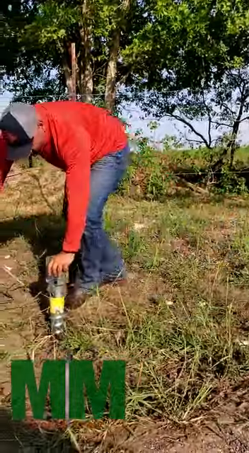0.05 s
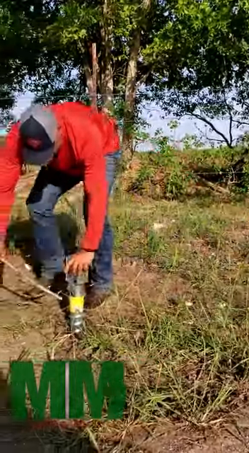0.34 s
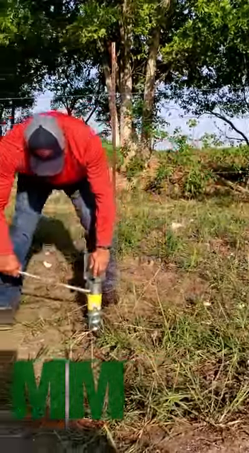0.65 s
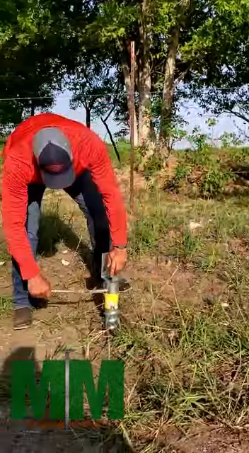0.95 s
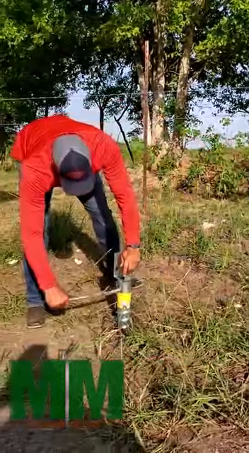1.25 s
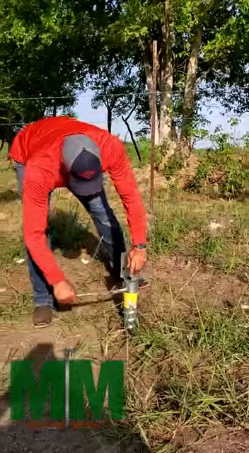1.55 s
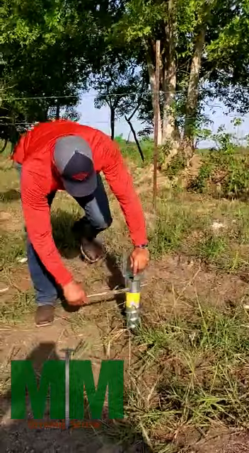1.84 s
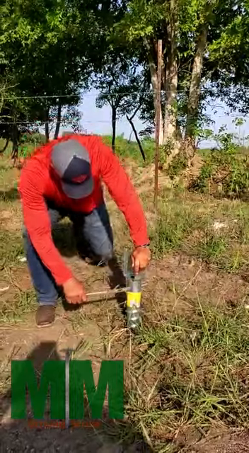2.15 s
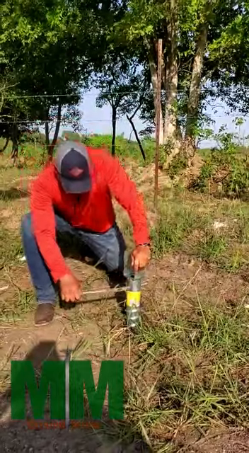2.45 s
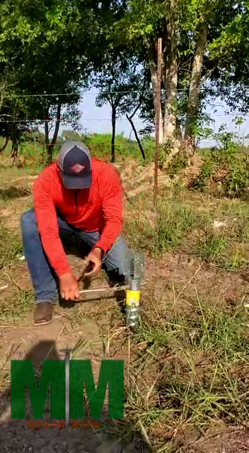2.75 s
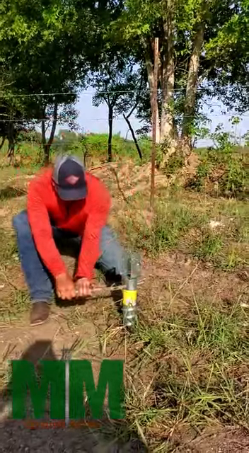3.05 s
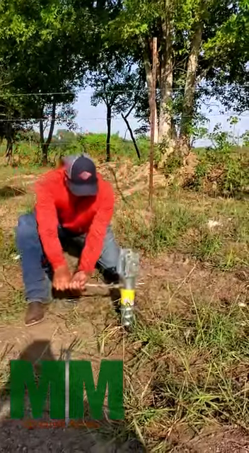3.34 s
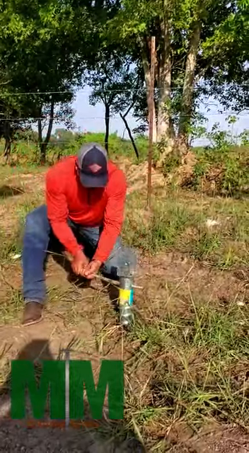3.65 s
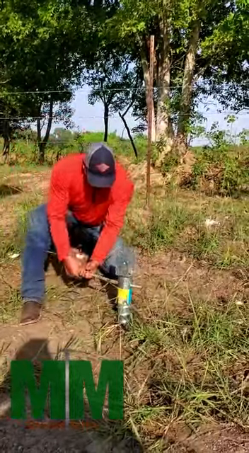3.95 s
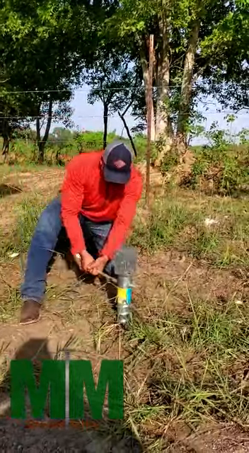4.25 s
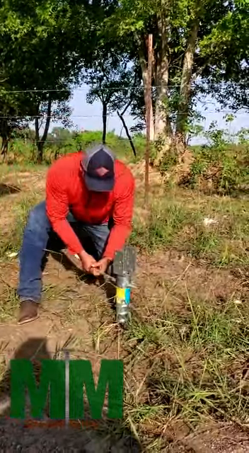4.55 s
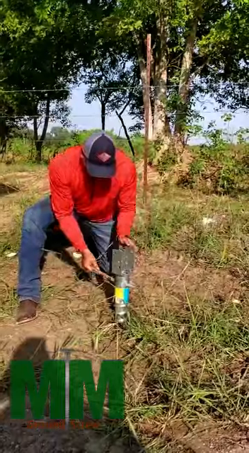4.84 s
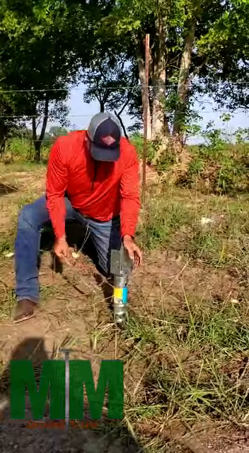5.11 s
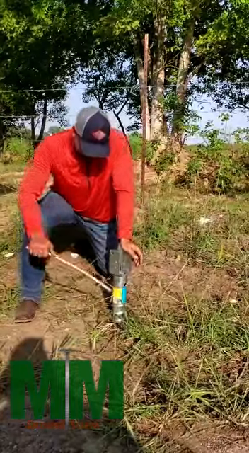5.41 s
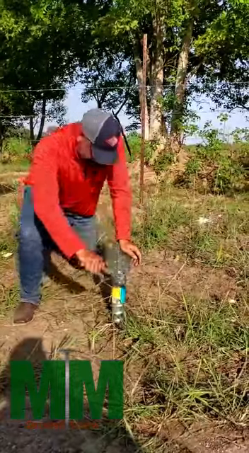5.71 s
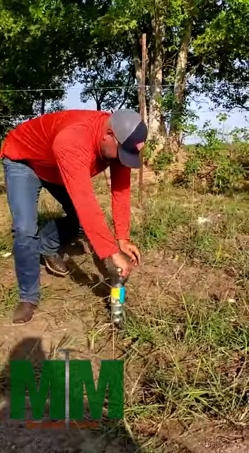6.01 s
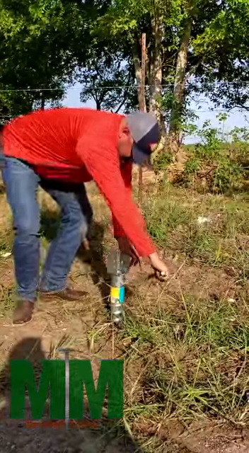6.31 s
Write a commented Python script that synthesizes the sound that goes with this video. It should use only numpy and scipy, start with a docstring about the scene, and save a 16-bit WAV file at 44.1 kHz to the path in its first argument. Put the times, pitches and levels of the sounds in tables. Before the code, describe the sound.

Close, bright metal clinks and rattles come in uneven clusters as a steel bar slides into the head of a ground screw outdoors, amid soft boot steps in dry grass. In a quieter stretch, the screw grinds briefly in the soil and small birds chirp faintly. A quick metallic clatter follows, then a few more knocks as tyre noise swells. A low rumble, far traffic and a thin hiss run underneath.

```python
"""A field, over a low rumble, a far road and a thin hiss. Boots brush and thud in grass; dry stalks snap.
A hand-held steel bar is threaded through the head of a ground screw: each contact clanks the earth-damped
tube and rings the bar, and its ribs tick over the rim. Faint birds whistle while the bar levers the screw
round, the thread grinding in dry soil. The bar clatters out and back in as a vehicle's tyres draw near."""
import sys
import numpy as np
from scipy import signal
from scipy.fft import rfft, irfft
from scipy.io import wavfile
from scipy.ndimage import uniform_filter1d

SR = 44100
rng = np.random.default_rng(int(sys.argv[2]) if len(sys.argv) > 2 else 0)


def unload_wav(signal):
    """Save mono or channel-first audio to the path in sys.argv[1] as 16-bit WAV at rate SR, clipped to [-1, 1]."""
    wavfile.write(
        sys.argv[1],
        SR,
        np.round(np.clip(np.atleast_2d(signal).T, -1, 1) * 32767).astype(np.int16),
    )


N = 289737
TIME = np.arange(N) / SR
BINS = np.fft.rfftfreq(N, 1 / SR)

# tone colour of the rumble, the road and the hiss: f/Hz, relative density/dB
RUMBLE_SPECTRUM = [(12, -71), (20, -29.5), (52, -0.5), (75, 2.5), (94, -1), (267, -28), (330, -94),
                   (430, -79), (730, -120)]
ROAD_SPECTRUM = [(120, -2), (200, -4.5), (419, -9.5), (812, -3.5), (916, -3.5), (1350, -3.5), (2380, -16.5),
                 (2760, -19.5), (3040, -19), (3920, -26), (5000, -26), (6500, -32), (11000, -120)]
HISS_SPECTRUM = [(2060, -7.5), (3500, -2.5), (4890, -6), (5340, -16), (7090, -5), (8000, -18.5),
                 (12500, -11.5), (14600, -10), (15800, -7.5)]
# fader rides of the rumble and the far road: t/s, level/dB
RUMBLE_RIDE = [(0, -52), (.5, -47.5), (1.8, -53), (2.55, -45), (3.2, -50), (3.6, -46), (6.57, -52)]
ROAD_RIDE = [(0, -61.5), (1.9, -60.5), (3.35, -57), (4.75, -54.5), (5.6, -58.5)]
# boots and clothes brushing dry grass: t/s, length/s, level/dB
GRASS_BRUSHES = [(0.0, 0.087, -62), (0.28, 0.45, -59), (2.04, 0.028, -50), (2.15, 0.51, -65),
                 (2.81, 0.28, -65.5), (5.17, 0.15, -60), (5.79, .12, -46.5), (6.06, 0.089, -58.5),
                 (6.13, 0.14, -58)]
# boots landing on soil: t/s, level/dB, thud f/Hz
FOOTFALLS = [(0.061, -57.5, 257), (0.512, -47.5, 380), (0.54, -52.5, 385), (2.048, -42, 202),
             (6.174, -43.5, 218)]
# dry stalks breaking: t/s, level/dB
STALK_SNAPS = [(0.316, -57), (2.228, -56.5), (2.478, -56.5), (3.335, -53.5), (3.695, -70)]
# bar hitting screw: t/s, level/dB, hardness/(dB per octave), extra main ring/dB,
# looseness (1 = usual grip), clank f/Hz, main ring f/Hz
BAR_HITS = [(0.4492, -35, 4.5, -1.5, 0.69, 1194, 2385), (0.503, -48, 2.8, 0, 2.1, 1210.0, 2463),
            (0.583, -47, -0.9, 0.5, 0.92, 1040, 2426), (0.718, -57, -3.5, 2.5, 2.0, 1185.0, 2440),
            (0.749, -53.5, -3.5, 2, 2.4, 1170.0, 2380), (0.784, -45, 0.2, 2, 1.13, 1700, 2440),
            (0.852, -33.5, 0.2, -14, 0.3, 1160, 2370), (0.865, -36, 0.5, 8, 1.6, 2025.0, 2390),
            (0.882, -40, -2, 7.5, 0.91, 1590.0, 2330), (0.8946, -26.0, 1.6, -7.5, 0.42, 1195, 2473),
            (1.129, -53.0, -2, 2, 1.3, 1610.0, 2440), (1.171, -51, -0.4, 5.5, 2.5, 1185.0, 2380),
            (1.204, -36.5, 8, 2, 0.31, 2040, 2453), (1.272, -46.5, 2.2, 0, 2.9, 1670.0, 2440),
            (1.3119, -39.5, -0.4, 0.5, 0.29, 1980, 2954), (1.466, -59, -4.5, 5, 0.37, 1190, 2480),
            (1.5823, -41.5, 3, 0.5, 0.84, 2060, 2482), (1.611, -50, -0.5, -1, 1.5, 2020.0, 2450),
            (1.676, -40, 0.2, 0.5, 2.9, 1210.0, 2670), (1.696, -32.5, -2.5, 1.5, 0.3, 1344, 2466),
            (1.7027, -28, 1.5, -2, 0.47, 1200.0, 2485), (1.789, -50.5, 0.0, 4.5, 0.69, 1750.0, 2443),
            (1.979, -62.5, -5, 3.5, 0.18, 1220.0, 2620), (4.6434, -47.5, -3, 0, 1.6, 1670, 2390),
            (4.676, -51.5, 1.5, 9.5, 0.22, 1200, 2524), (4.858, -36, -1, 0.5, 0.97, 1770, 2480),
            (4.884, -38.5, -4.5, 2, 0.32, 1710, 2420), (4.901, -42, 0.7, 0.5, 0.87, 1670, 2450),
            (4.915, -40, 0, 4, 3.5, 1600.0, 2450), (4.931, -34.5, 1, 1, 1.7, 1600.0, 2380),
            (4.9423, -35.5, -1, 12, 2, 1610.0, 2380), (4.959, -35.5, 8, -6, 1.02, 1605.0, 2420),
            (4.966, -37, 10, 6, 0.81, 1546, 2384), (5.776, -35.5, 1.3, -2.5, 0.78, 1680, 2330),
            (5.81, -44.5, -4, -1, 0.33, 1260, 2580), (6.349, -44.5, -3.2, -2.5, 0.92, 1420, 2550),
            (6.499, -47.5, -5.5, -2.5, 1.1, 1660, 2460), (6.535, -39, 1.5, -14, 2.1, 1690.0, 2400),
            (6.552, -52, 1, 11.5, 0.84, 1680, 2340)]
# modes of the screw's tube, damped by the soil: f/Hz, nominal width/Hz, level/dB
TUBE_MODES = [(565, 45, -17), (1200, 65, -9), (1610, 67, -12), (2420, 35, 0), (2900, 57, -17),
              (3380, 73, -18), (3900, 31, -14), (4480, 81, -10), (4790, 67, -13), (5160, 78, -17),
              (5440, 25, -21), (5590, 31, -22), (5950, 140, -15), (6380, 36, -25), (6580, 43, -24),
              (6980, 150, -20), (7740, 42, -25), (8970, 110, -25), (9580, 98, -39), (10200, 30, -37),
              (10300, 28, -41), (10700, 45, -31), (11100, 55, -34), (12100, 35, -26), (12400, 29, -36),
              (12800, 83, -41)]
# modes of the bar: f/Hz, level/dB, t60 at the usual grip/s
BAR_MODES = [(1260, -19, .12), (1690, -15, .12), (2024, -19, .14), (2416, 2, .21), (2546, -12, .1),
             (3112, -15, .16), (3450, -15, .24), (3908, -13, .13), (4105, -14, .15), (4480, -11, .16),
             (4550, -17, .28), (4786, -11, .11), (5170, -18, .16), (5441, -16, .14), (5965, -11, .13),
             (6975, -15, .12), (7744, -19, .18), (8975, -24, .13), (10730, -27, .15), (12075, -26, .14)]
# dense rattle of a contact: f/Hz, relative density/dB
RATTLE_SPECTRUM = [(71, -52), (120, 0.5), (1020, -8), (1190, -10.5), (1830, -40), (2200, -21), (2440, 1),
                   (2750, -11), (3660, -5.5), (4480, -2.5), (5490, -11), (7160, -13), (8420, -29),
                   (9130, -29.5), (15500, -30)]
# the five registers of a hit (thump, clank, main ring, upper ring, sparkle): low f/Hz, high f/Hz
HIT_REGISTERS = [(170, 900), (900, 2100), (2100, 2900), (2900, 5500), (5500, 15800)]
# voice of each register: radiation/dB, favoured mode over the rest/dB, its t60 at the usual grip/s
REGISTER_VOICES = [(-5, 4, 0.039), (3.6, 1.5, 0.084), (9, -2, 0.17), (4, 0.5, 0.09), (-5.5, -3, 0.16)]
# favoured mode of thump, upper ring and sparkle: usual f/Hz, relative spread from hit to hit
FAVOURED_MODES = [(680, .2), (4490, .05), (5930, 0.0058)]
# bar sliding in its hole: t/s, length/s, level/dB
BAR_SLIDES = [(0.73, 0.13, -44), (1.63, 0.16, -50), (4.87, 0.13, -34.5), (5.8, 0.087, -50.5),
              (6.45, 0.12, -51.5)]
# bird notes: t/s, length/s, f/Hz, glide/octaves, arch above both ends/octaves, level/dB
BIRD_NOTES = [(2.494, 0.029, 2730, -0.29, 0.064, -59.5), (2.651, 0.049, 3900, -0.027, 0.0061, -63),
              (2.701, 0.035, 2900, -0.6, 0.011, -61), (3.414, 0.045, 2790, -0.099, 0.051, -54.5),
              (3.817, 0.037, 2110, -.05, 0.047, -66), (4, 0.081, 2940, -0.03, 0.037, -61),
              (4.064, 0.024, 2730, .16, -0.035, -52.5), (4.498, 0.027, 2794, 0.035, .2, -49),
              (4.606, 0.04, 2860, -0.33, .09, -57), (5.203, .035, 2210, .16, -0.0081, -61.5),
              (5.482, 0.04, 2940, 0.39, -0.041, -61)]
# pulls on the bar that turn the screw: t/s, length/s, level/dB
LEVER_PULLS = [(3.11, 0.32, -56.5), (3.354, 0.19, -51), (4.107, 0.16, -53)]
# resonances of the buried screw: f/Hz, width/Hz, gain/dB
BURIED_RESONANCES = [(2730, 28, 15), (3300, 810, 1), (4350, 1300, -0.5), (5190, 100, 7.5), (6510, 120, 5.5),
                     (7000, 170, 3.5), (8940, 630, -8.5), (10600, 390, -11)]
# stereo balance of near and far sounds: f/Hz, left minus right/dB
NEAR_PAN = [(100, 2.5), (600, -3), (1200, -5), (1900, -0.5), (2450, 0.5), (3300, -5.5), (4500, -8),
            (6500, -9.5), (13000, -15)]
FAR_PAN = [(60, -1.5), (110, 0.5), (200, -0.5), (380, -1), (700, -1.5), (1290, -2.5), (2380, 1.5),
           (4400, -9.5), (8120, -5), (15000, -4.5)]
# stereo phase of near sounds: f/Hz, left lead/rad
NEAR_LEAD = [(100, -0.13), (600, -0.86), (1200, -0.81), (2400, -1.93), (4000, -2.44), (9000, -0.7)]
# stereo likeness of near and far sounds: f/Hz, left-right correlation
NEAR_CORRELATION = [(200, 1), (2400, 0.69), (4500, 0.37), (12000, 0.64)]
FAR_CORRELATION = [(60, 1), (130, 0.99), (290, 0.94), (640, 0.75), (1410, 0.56), (3100, -0.2), (6820, 0.12),
                   (15000, -0.079)]


def undb(db):
    """Decibels to gain."""
    return 10 ** (np.asarray(db) / 20)


def unit(x):
    """Scale to rms 1."""
    return x / np.sqrt(np.mean(x ** 2) + 1e-20)


def unit_attack(x, size=353):
    """Scale to rms 1 over the attack, by default the first 8 ms."""
    return x / np.sqrt(np.mean(x[:, :size] ** 2) + 1e-20)


def curve(points, hz):
    """Read an (f/Hz, value) curve on a log-frequency axis."""
    f, value = np.transpose(points)
    return np.interp(np.log(np.maximum(hz, 1)), np.log(f), value)


def add(out, s, sound):
    """Mix a sound in at time s."""
    i = max(int(s * SR), 0)
    out[:, i:i + sound.shape[-1]] += sound[..., :max(N - i, 0)]


def band(x, lo_hz, hi_hz, order=3):
    """Causal band-pass."""
    sos = signal.butter(order, [lo_hz, min(hi_hz, SR / 2 - 1)], "band", fs=SR, output="sos")
    return signal.sosfilt(sos, x)


def fade(t, t60):
    """Hold at 1 until t = 0, then fall 60 dB every t60."""
    return np.exp(-np.log(1000) * np.maximum(t, 0) / t60)


def drift(rate_hz):
    """Smooth random wander at rms 1."""
    hold = int(SR / rate_hz)
    steps = np.repeat(rng.standard_normal(N // hold + 1), hold)
    return unit(uniform_filter1d(uniform_filter1d(steps, hold), hold)[:N])


def noise(spectrum, correlation, size=N):
    """Coloured stereo noise whose width is set per frequency."""
    hz = np.fft.rfftfreq(size, 1 / SR)
    alike = np.clip(curve(correlation, hz), -1, 1)
    mid, side = rfft(rng.standard_normal((2, size)))
    pair = mid * np.sqrt(1 + alike) + np.array([[1], [-1]]) * side * np.sqrt(1 - alike)
    return unit(irfft(pair * undb(curve(spectrum, hz)), size))


def grains(per_s, spread_db):
    """Random tiny impacts, a few much larger than the rest."""
    clicks = (rng.random(N) < per_s / SR) * rng.choice([-1, 1], N)
    return clicks * undb(spread_db * np.minimum(rng.exponential(size=N), 4))


def swells(rows, taper):
    """Soft-edged envelope from rows of t/s, length/s, level/dB."""
    out = np.zeros((1, N))
    for s, length, db in rows:
        add(out, s, undb(db) * signal.windows.tukey(max(int(length * SR), 2), taper))
    return out[0]


def place(x, balance, phase=None):
    """Stereo placement: level and phase differences between the two microphone ports."""
    lead = 0 if phase is None else curve(phase, BINS)
    tilt = undb(curve(balance, BINS))
    left_right = np.array([tilt * np.exp(1j * lead), np.ones(len(BINS))]) * 2 / (1 + tilt)
    return irfft(rfft(x) * left_right, N)


def rumble(throb_db=1.1):
    """A low, throbbing bed of noise."""
    bed = noise(RUMBLE_SPECTRUM, FAR_CORRELATION)
    return bed * undb(np.interp(TIME, *np.transpose(RUMBLE_RIDE)) + throb_db * drift(12))


def road(speed_m_s=23, closest_s=6.638, closest_m=2.4, tyres_at_1m_db=-30.5, flutter_db=1.46):
    """The wash of a far road, and one vehicle whose tyre noise grows as 1 / distance."""
    distance_m = np.hypot(speed_m_s * (TIME - closest_s), closest_m)
    far_traffic = undb(np.interp(TIME, *np.transpose(ROAD_RIDE)))
    level = np.hypot(far_traffic, undb(tyres_at_1m_db) / distance_m)
    return noise(ROAD_SPECTRUM, FAR_CORRELATION) * level * undb(flutter_db * drift(8))


def hiss(level_db=-67.5):
    """A thin, even layer of air on top."""
    return noise(HISS_SPECTRUM, FAR_CORRELATION) * undb(level_db)


def grass(sizzle_db=-5, patchy_db=3.5):
    """Dry stalks crackle in uneven patches as boots and clothes brush them."""
    stalks = np.array([grains(per_s=2200, spread_db=3.5) for _ in range(2)])
    crackle = unit(band(stalks, 2400, 7300, order=2))
    sizzle = undb(sizzle_db) * unit(band(stalks, 9500, 18000, order=2))
    return (crackle + sizzle) * swells(GRASS_BRUSHES, taper=1) * undb(patchy_db * drift(45))


def boots(t60=0.057, heel_s=0.0029, band_ratio=1.85):
    """Each heel pushes a dull thud out of the packed soil."""
    out, t = np.zeros((2, N)), np.arange(SR // 5) / SR
    for s, db, hz in FOOTFALLS:
        push = rng.standard_normal((1, len(t))) * fade(t, t60) * (1 - np.exp(-t / heel_s))
        thud = band(push, hz / band_ratio, hz * band_ratio)
        add(out, s, undb(db) * unit_attack(thud, size=882))
    return out


def snaps(t60=0.089):
    """A stalk breaks in a quick run of splinters."""
    out, t = np.zeros((2, N)), np.arange(SR // 12) / SR
    for s, db in STALK_SNAPS:
        splinters = rng.standard_normal((2, len(t))) ** 3 * fade(t, t60)
        add(out, s, undb(db) * unit_attack(band(splinters, 1900, 4400, order=1)))
    return out


def ring(t, hz, db, t60, scatter_db, detune):
    """Struck steel modes; the point of contact changes their strengths and shifts them a little."""
    strength, shift, spread = rng.standard_normal((3, len(hz)))
    phase = rng.uniform(0, 2 * np.pi, len(hz))
    apart = np.arccos(np.clip(curve(NEAR_CORRELATION, hz), -1, 1)) * spread / 2
    weights = undb(db + scatter_db * strength) * np.exp(1j * (phase + np.array([apart, -apart])))
    waves = np.exp(2j * np.pi * (hz * (1 + detune * shift))[:, None] * t) * fade(t, t60[:, None])
    return unit_attack((weights @ waves).imag)


def sheen_db(hz, lift_db=5.5):
    """A direct steel-on-steel blow lifts a band of high modes."""
    return lift_db * ((hz > 8400) & (hz < 11500))


def steel_blow(t, loose, chatter_s, bar_db=-3, rattle_db=-2, thud_db=-11):
    """One raw hit: the tube clanks, the bar rings, the contact rattles, the shank thuds into the soil."""
    hz, width, db = np.transpose(TUBE_MODES)
    tube_t60 = 1.15 * np.log(1000) / np.pi / width
    tube = ring(t, hz, db + sheen_db(hz), tube_t60, scatter_db=4, detune=0.005)
    hz, db, t60 = np.transpose(BAR_MODES)
    bar = ring(t, hz, db + sheen_db(hz), t60 * loose, scatter_db=5, detune=0.0016)
    rattle = unit_attack(noise(RATTLE_SPECTRUM, NEAR_CORRELATION, len(t)) * fade(t - chatter_s, 0.065))
    thud = unit_attack(band(rng.standard_normal((1, len(t))) * fade(t, 0.12), 114, 500, order=2))
    return tube + undb(bar_db) * bar + undb(rattle_db) * rattle + undb(thud_db) * thud


def clinks(chatter_s=0.0036, rise_s=0.00064, choke_t60=0.075, punch=0.23, mode_punch=0.39, pivot_hz=2260):
    """Bar meets screw: each blow is voiced in five registers and chokes the ring before it."""
    out, t = np.zeros((2, N)), np.arange(SR // 4) / SR
    free_hz = np.array([mode[0] for mode in [*TUBE_MODES, *BAR_MODES]])
    usual_hz, spread = np.transpose(FAVOURED_MODES)
    landings = rng.standard_normal((len(BAR_HITS), len(FAVOURED_MODES)))
    gaps = np.diff([hit[0] for hit in BAR_HITS] + [2 * N / SR])
    touching = fade(t - chatter_s, 0.072)  # the steel is loudest while the parts still touch
    for hit, gap, landing in zip(BAR_HITS, gaps, landings):
        s, level_db, hardness, ring_db, loose, clank_hz, ring_hz = hit
        loose = max(loose, 0.2)
        blow = steel_blow(t, loose, chatter_s)
        # where the bar lands favours one mode in each register
        pitches = np.insert(usual_hz * np.exp(spread * landing), 1, [clank_hz, ring_hz])
        # a harder hit tilts brighter about the pivot, levelling off an octave above it
        octaves = np.minimum(np.log2(np.insert(usual_hz, 1, [clank_hz, ring_hz]) / pivot_hz), 1)
        levels = level_db + hardness * octaves + ring_db * np.array([0, 0, 1, 0, 0])
        choke = fade(t - gap, choke_t60 * loose ** 2)  # a loose bar rings on through the next hit
        envelope = (1 - np.exp(-t / rise_s)) * (1 + punch * touching) * choke
        for (lo, hi), db, hz, voice in zip(HIT_REGISTERS, levels, pitches, REGISTER_VOICES):
            radiation_db, mode_db, t60 = voice
            # a pressed bar is pulled off pitch, a loose one settles on the nearest free mode
            nearest_hz = free_hz[np.argmin(abs(free_hz - hz))]
            hz = hz + (nearest_hz - hz) * min(loose, 1) ** 2
            decay = fade(t, t60 * loose ** 0.75) * (1 + mode_punch * touching)
            mode = np.sin(2 * np.pi * hz * t)[None] * decay
            register = unit_attack(band(blow, lo, hi)) + undb(mode_db) * unit_attack(mode)
            add(out, s, undb(db + radiation_db) * unit_attack(register * envelope))
    return out


def slides(bar_db=-2, tick_db=-12):
    """The ribs of the bar tick densely over the rim of the hole and keep both parts singing."""
    t = np.arange(SR // 8) / SR
    hz, width, db = np.transpose(TUBE_MODES)
    tube = ring(t, hz, db, np.log(1000) / np.pi / width, scatter_db=4.5, detune=0.012)
    bar = ring(t, *np.transpose(BAR_MODES), scatter_db=2, detune=0.0006)
    ticks = grains(per_s=560, spread_db=3.5)
    steel = signal.fftconvolve(tube + undb(bar_db) * bar, ticks[None], axes=1)[:, :N]
    bright = unit(band(steel, 2740, 18000, order=1))  # tiny hard contacts stress the upper modes
    scrape = unit(bright + undb(tick_db) * unit(band(ticks, 1300, 5800)))
    return scrape * swells(BAR_SLIDES, taper=0.53)


def birds(waver=0.013):
    """Short slurred whistles from the trees, each a straight or arched glide."""
    out, wobble = np.zeros((2, N)), 1 + waver * drift(300)
    for s, length, pitch_hz, glide, arch, db in BIRD_NOTES:
        progress = np.linspace(0, 1, max(int(length * SR), 2))
        octaves = glide * (progress - 0.5) - arch * (2 * progress - 1) ** 2
        hz = pitch_hz * 2 ** octaves * wobble[int(s * SR):][:len(progress)]
        whistle = np.sqrt(2) * np.sin(2 * np.pi * np.cumsum(hz) / SR)
        add(out, s, undb(db) * np.sin(np.pi * progress) * whistle)
    return out


def grinding(fizz_db=-5, catch_db=-2.2, build_share=0.67, start_db=-22.5, stop_t60=0.13):
    """Dry soil slips along the thread in dense grains, heard through the buried screw and as fine fizz."""
    grit = np.array([grains(per_s=3500, spread_db=3) for _ in range(2)])
    body = sum(undb(db) * band(grit, hz - width / 2, hz + width / 2, order=1)
               for hz, width, db in BURIED_RESONANCES)
    fizz = undb(fizz_db) * unit(band(grit, 8200, 21700, order=2))
    effort = np.zeros(N)
    for s, length, db in LEVER_PULLS:  # each pull builds, holds, then dies quickly
        slack = np.maximum(1 - (TIME - s) / (build_share * length), 0)
        effort += undb(db + start_db * slack) * fade(TIME - s - length, stop_t60)
    catching = undb(catch_db * drift(60))  # the thread catches and lets go unevenly
    return unit(unit(body) + fizz) * effort * catching


def field_scatter(x, t60, build_s, top_hz):
    """A short outdoor tail, scattered back from the grass and the tree line."""
    t = np.arange(SR // 2) / SR
    wash = band(rng.standard_normal((2, len(t))), 200, top_hz, order=1)
    tail = wash * fade(t, t60) * (1 - np.exp(-t / build_s))
    return signal.fftconvolve(x, unit(tail) / np.sqrt(len(t)), axes=1)[:, :N]


def scene():
    """Steel, soil and boots up front, birds in the trees, the distant bed behind."""
    near = clinks() + slides() + grinding() + boots() + grass() + snaps()
    song = birds()
    near += undb(-24.5) * field_scatter(near, t60=0.29, build_s=0.0037, top_hz=6100)
    song += undb(-7.5) * field_scatter(song, t60=0.13, build_s=0.0082, top_hz=5000)
    far = rumble() + road() + hiss()
    return place(near, NEAR_PAN, NEAR_LEAD) + song + place(far, FAR_PAN)


def record(dry):
    """A steep low-pass shaves off the very top."""
    return signal.sosfilt(signal.ellip(10, 0.2, 70, 15950, fs=SR, output="sos"), dry)


dry = scene()
out = record(dry)
unload_wav(out)
```